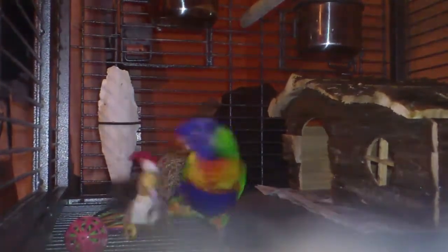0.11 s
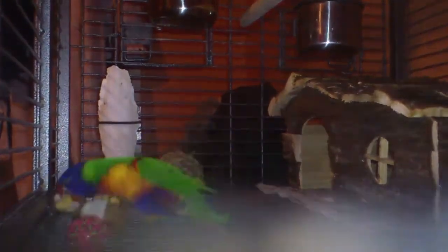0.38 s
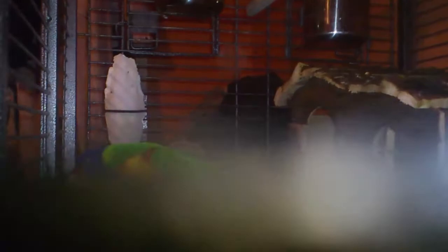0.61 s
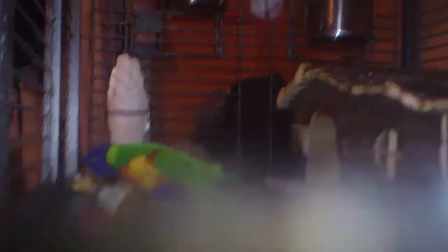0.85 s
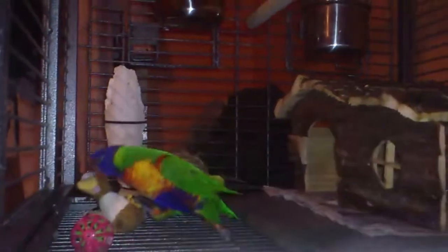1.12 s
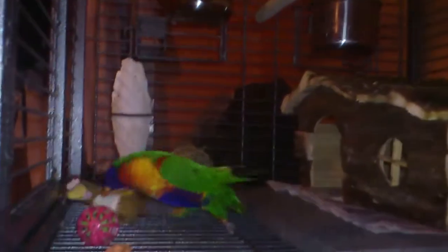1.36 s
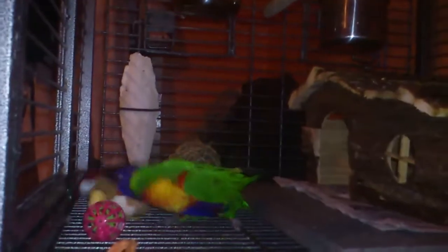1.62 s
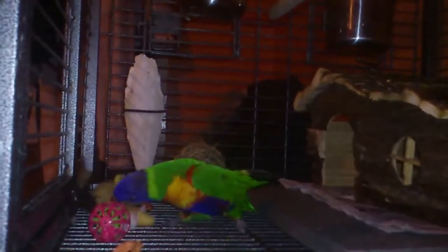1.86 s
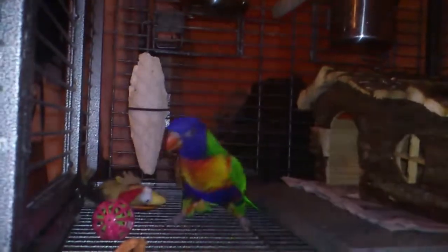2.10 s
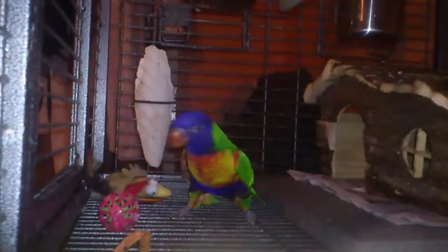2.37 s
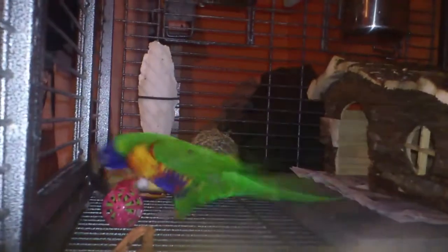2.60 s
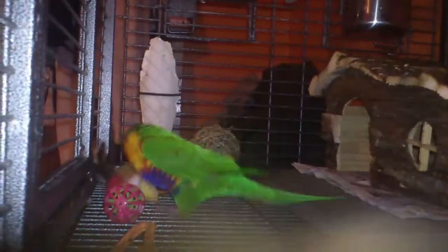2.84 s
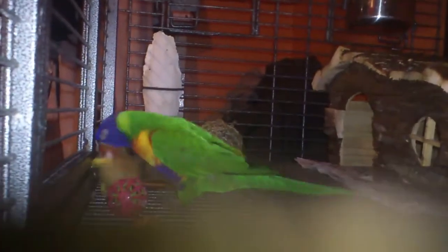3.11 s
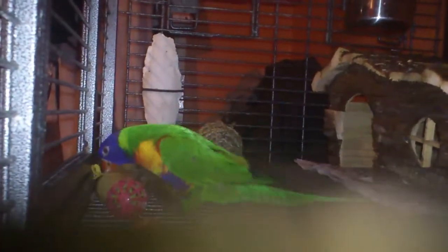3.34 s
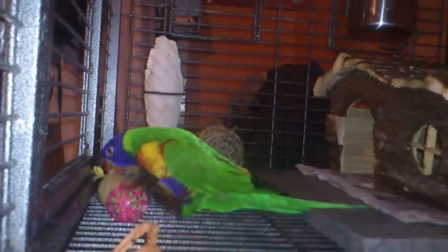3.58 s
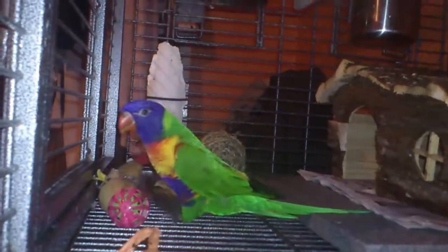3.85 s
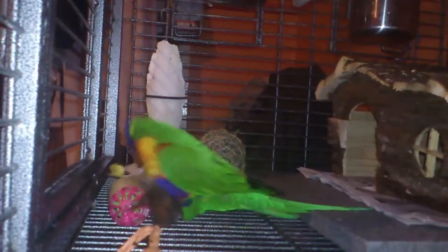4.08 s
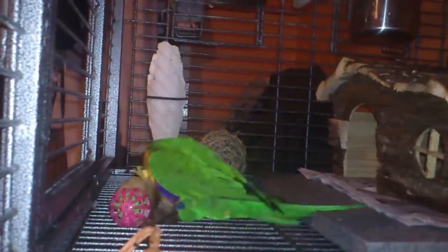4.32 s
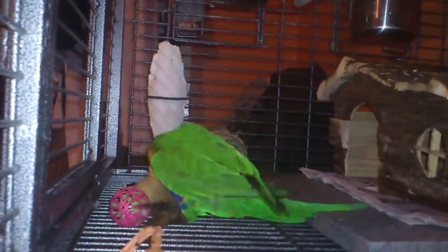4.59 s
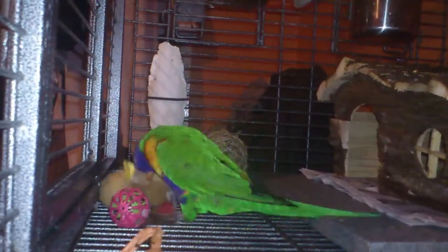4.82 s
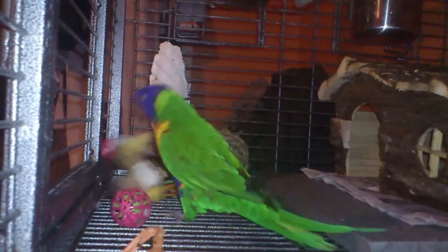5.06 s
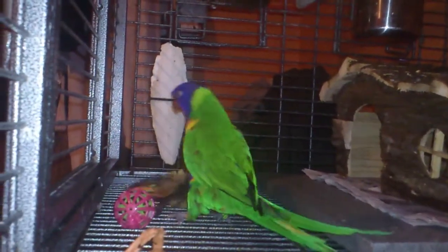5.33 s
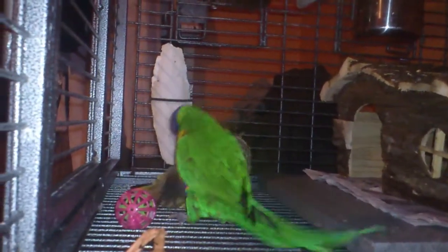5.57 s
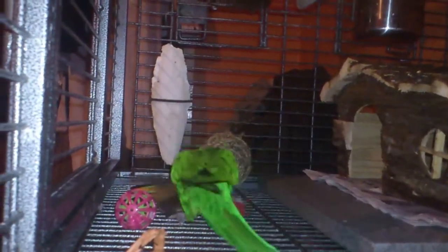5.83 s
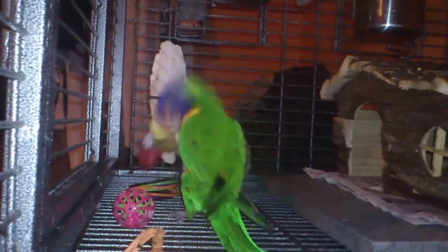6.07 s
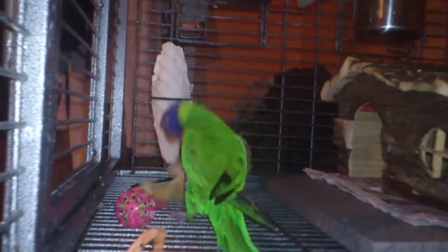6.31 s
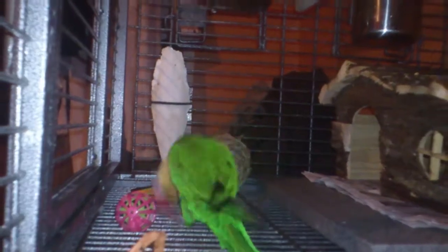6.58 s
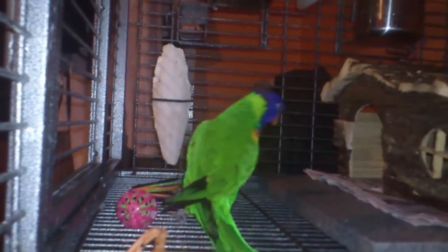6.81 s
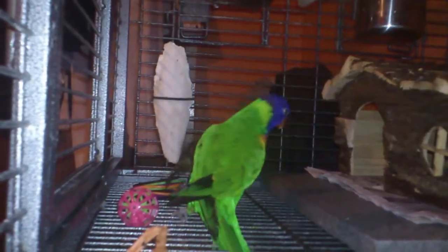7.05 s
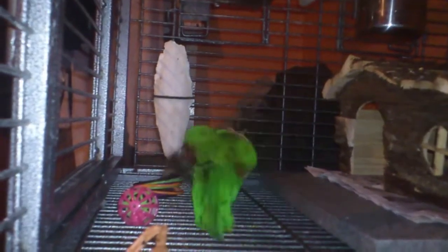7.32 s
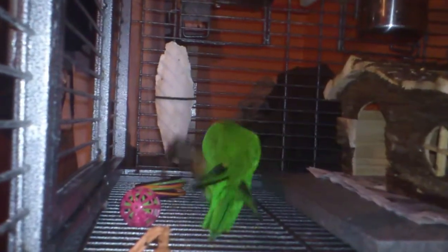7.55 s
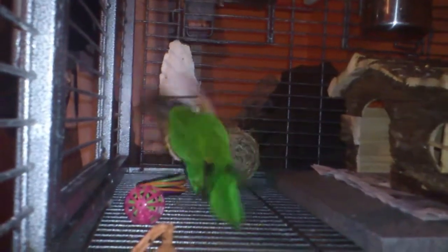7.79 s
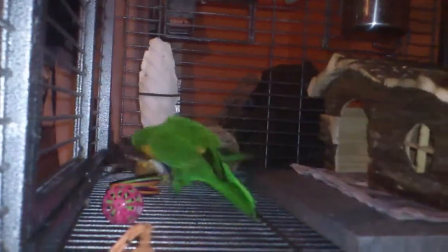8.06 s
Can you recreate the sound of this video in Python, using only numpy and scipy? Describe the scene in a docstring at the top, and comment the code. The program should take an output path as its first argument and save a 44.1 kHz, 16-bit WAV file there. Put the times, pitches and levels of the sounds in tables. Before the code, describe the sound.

A small parrot knocks a toy about its metal cage, irregular clanks and wire rattles mixed with short hoarse squeaks, close up in a quiet room.

```python
"""Beside a small parrot's cage in a quiet room: the bird beats a toy about the wire grate.
Blows and drags are bursts of noise that ring the wires, panels and tray; clacks and knocks are damped tones.
Beak and claws tick with short snaps, an edge scrapes, and the bird squeaks in shaky, hoarse whistles.
A hand bumps the close, hand-held camera; its right port hears less treble, and the room hums and hisses."""
import sys
import numpy as np
from scipy import signal
from scipy.fft import rfft, irfft
from scipy.io import wavfile
from scipy.ndimage import uniform_filter1d

SR = 44100
rng = np.random.default_rng(int(sys.argv[2]) if len(sys.argv) > 2 else 0)


def store_wav(level_fs):
    """Save 16-bit WAV to argv[1]."""
    pcm = np.round(np.clip(np.atleast_2d(level_fs), -1, 1) * 32767)
    wavfile.write(sys.argv[1], SR, pcm.T.astype(np.int16))


def magnitude_from_level(level_db):
    """Linear magnitude for a level in decibels (20 dB per decade)."""
    exponent = np.asarray(level_db, float) / 20
    return 10 ** exponent


N = 360297
TIME = np.arange(N) / SR
TOP_HZ = 16000

# the three bands in which a contact pushes, low to high: low_hz, high_hz
BAND_HZ = [(25, 2000), (2000, 6500), (6500, 16000)]
# hollow clacks of the toy, and low or ringing knocks under hard blows:
# start_s, base_hz, level_db (lowest tone), step_db (per overtone),
# t60_s (time the lowest tone takes to fall by 60 dB)
CLACKS = [(2.3984, 2887, -10.5, 4.5, 0.015), (2.4908, 2030, -18.5, -4.5, 0.0047),
          (5.107, 657, -21.5, -29, 0.1), (5.4829, 2870, -12, 3.5, 0.012), (5.498, 2630, -20.5, -27, 0.033),
          (5.574, 1794, -18.5, -17, 0.017), (6.2543, 2660, -5.5, -15, 0.019)]


def colour(x, points):
    """Shape the spectrum by (Hz, dB) points, joined along a logarithmic pitch scale."""
    hz, db = np.transpose(points)
    f = np.maximum(np.fft.rfftfreq(x.shape[-1], 1 / SR), 1)
    gain = magnitude_from_level(np.interp(np.log(f), np.log(hz), db))
    return irfft(rfft(x) * gain, x.shape[-1])


def band(x, lo_hz, hi_hz):
    """Keep what lies between two pitches, with a causal band-pass."""
    return signal.sosfilt(signal.butter(2, [lo_hz, hi_hz], "bandpass", fs=SR, output="sos"), x)


def unit(x):
    """Scale to energy 1."""
    return x / np.sqrt(np.sum(x ** 2, axis=-1, keepdims=True))


def through(x, response):
    """Let a sound ring through one response per channel (convolution)."""
    return signal.fftconvolve(np.atleast_2d(x), response, axes=1)[:, :N]


def ring(s, hz, db, t60, rise):
    """One damped tone that starts at s seconds, rises and dies away."""
    out = np.zeros(N)
    i = int(s * SR) + 1
    t = TIME[i:i + int(2 * t60 * SR)] - s
    fade = magnitude_from_level(db - 60 * t / t60)
    out[i:i + len(t)] = fade * np.minimum(t / rise, 1) * np.sin(2 * np.pi * hz * t)
    return out


def room(t60, wet_db):
    """Direct sound, then a short dull tail of noise from cage walls and furniture."""
    t = np.arange(SR // 2) / SR
    tail = band(rng.standard_normal((2, len(t))), 570, 7300)
    tail = tail * magnitude_from_level(-60 * t / t60) * (t > .002)
    tail = magnitude_from_level(wet_db) * unit(tail)
    tail[:, 0] = 1  # the direct sound
    return tail


def bursts(rows):
    """Noise bursts (s, rise s, fall s, three band dB), each band with the energy of 20 ms at its level."""
    out = np.zeros((3, N + SR))
    for s, rise, fall, *db in rows:
        t = np.arange(int((rise + 6 * fall + 0.018) * SR)) / SR
        shape = np.where(t < rise, t / rise, np.exp((rise - t) / fall))
        # uneven grains: the contact chatters
        chatter = magnitude_from_level(6.7 * rng.standard_normal(len(t) // 64 + 1)).repeat(64)[:len(t)]
        grains = rng.standard_normal(len(t)) * chatter
        # each contact lands on another spot and has its own colour
        spot = .12 * rng.standard_normal(16)
        spot[0] = 1
        grains = signal.lfilter(spot, 1, grains)
        parts = unit(np.array([band(shape * grains, *hz) for hz in BAND_HZ]))
        i = int(s * SR)
        out[:, i:i + len(t)] += magnitude_from_level(np.array(db))[:, None] * parts * np.sqrt(SR / 50)
    return out[:, :N]


def cage(count):
    """How the cage rings at both ports: clusters of wire tones over the dense ring of the panels."""
    # overtones of the wires, each a cluster of unequal bars: pitch_hz, level_db (relative), t60_s
    wire_rows = [(385.5, 6.5, 1.31), (1049, 3, 1.3), (2030, -2.5, 0.7), (3410, -9, 1), (5056, -5, 0.6),
                 (9360, -2, 0.38), (9970, 6, 0.066), (10430, -11, 0.046), (11760, -12, 0.58),
                 (14900, -14, 0.31)]
    # loose panels and tray, too dense for single tones: pitch_hz, level_db (relative), t60_s
    panel_rows = [(51.6, -5.5, 1), (128.6, 0.5, 0.93), (275.7, 7, 0.9), (738, 12, 0.54), (1435, 14, 0.21),
                  (2960, -1.5, 0.1), (3500, 5.5, 0.29), (8260, -8, 0.37)]
    apart = 0.95  # how much the panel ring differs between the ports from 600 Hz up; less below
    t = np.arange(SR) / SR
    wires = np.zeros((2, SR))
    for hz, db, t60 in wire_rows:
        detune = rng.standard_normal((count, 1))
        phase = 2 * np.pi * rng.random((count, 1))
        # the ports hear each bar out of step, more so at high pitch
        lag = min(hz / 1500, 3) * rng.standard_normal((count, 1))
        alive = t[:int(t60 * SR)]
        fade = magnitude_from_level(db - 60 * alive / t60)
        angle = 2 * np.pi * (hz + (15 + .016 * hz) * detune) * alive + phase
        wires[:, :len(alive)] += fade * np.array([np.sin(angle).sum(0), np.sin(angle + lag).sum(0)])
    panels = 0
    for hz, db, t60 in panel_rows:
        mid, side = band(rng.standard_normal((2, SR)), hz / 1.285, min(hz * 1.354, TOP_HZ))
        side = apart * min(hz / 600, 1) ** 0.54 * side
        pair = np.array([mid + side, mid - side])
        panels = panels + magnitude_from_level(db - 60 * t / t60) * pair / pair.std()
    return wires + magnitude_from_level(14.0) * panels


def rattle():
    """Blows, drags, clacks and knocks shake the cage; each band of the push rings its own part."""
    # blows on grate and bars, pushes before the cage rings:
    # start_s, tip_db (wire tips, over 6.5 kHz), frame_db (under 2 kHz)
    blow_rows = [(0.198, -59.5, -45), (0.3439, -44.5, -46), (1.482, -43.5, -52.5), (1.5669, -30, -44.5),
                 (1.653, -43, -53.5), (2.5532, -48, -65), (2.649, -44.5, -57.5), (2.784, -50.5, -83),
                 (2.8136, -41, -54.5), (3.202, -50, -81), (3.263, -50.5, -44.5), (3.6282, -49, -51.5),
                 (4.1912, -55.5, -51), (4.219, -49, -56), (4.4169, -50.5, -54), (4.941, -51.5, -52),
                 (5.103, -44.5, -29), (5.8663, -44, -43.5), (5.891, -46, -53), (6.246, -34.5, -19),
                 (7.2296, -44.5, -59), (7.3157, -31.5, -51.5), (7.3647, -31.5, -36), (7.513, -51, -61),
                 (7.6301, -45.5, -59.5), (7.716, -40, -48.5), (7.813, -34.5, -45), (7.8919, -33.5, -24.5)]
    # the toy dragged over the grate: start_s, peak_s,
    # end_s (sets the fall; if before the peak, the drag dies within a few ms),
    # low_db, middle_db, high_db (pushes before the cage rings)
    drag_rows = [(0, 0.034, 0.038, -35, -43, -69), (3.033, 3.269, 3.06, -42.5, -49, -48),
                 (4.877, 4.88, 5, -42, -54, -71), (6.85, 6.91, 7.077, -31.5, -38.5, -41.5)]
    rows = []
    for s, tip, low_db in blow_rows:
        # the harder the frame is hit, the longer the toy clatters on
        rise = 0.0013 + 0.006 * magnitude_from_level(low_db + 24)
        fall = 0.0077 + 0.023 * magnitude_from_level(3.8 * (low_db + 16.0))
        # the bars between get a mix of both pushes
        bars_db = low_db + 0.3 * (tip - low_db) - 1.6
        rows.append((s, rise, fall, low_db, bars_db, tip))
    for s, hz, db, step, t60 in CLACKS:
        rows.append((s, .001, .002, db - 50, db - 40, db - 34 + step))
    drags = [(start, max(peak - start, .001), max(end - peak, .003) / 3, *db)
             for start, peak, end, *db in drag_rows]
    response = cage(count=22)
    # how strongly the cage answers in each band, to even the bands out
    size = []
    for lo_hz, hi_hz in BAND_HZ:
        energy = np.mean(np.sum(band(response, lo_hz, hi_hz) ** 2, axis=1))
        size.append(np.sqrt(energy * SR / 2 / (hi_hz - lo_hz)))
    dragged = bursts(drags)
    low, mid, high = bursts(rows) + dragged
    # dragging sets the tray rumbling
    low = low + magnitude_from_level(-7.0) * band(dragged[0], 39, 410)
    frame = magnitude_from_level(8) * through(low, response) / size[0]
    # loose joints buzz as long as the frame shakes
    buzz = np.abs(frame[0]) * rng.standard_normal(N)
    mid = magnitude_from_level(7.5) * mid + magnitude_from_level(-6.0) * band(buzz, *BAND_HZ[1])
    high = magnitude_from_level(12.5) * band(high, 5940, 15200) + magnitude_from_level(-8.5) * band(buzz, *BAND_HZ[2])
    bars_and_tips = through(mid / size[1] + high / size[2], response)
    # the contact itself is heard too, dry
    contact = magnitude_from_level(-6.5) * (low + mid + high)
    return frame + bars_and_tips + contact


def clacks():
    """Clacks and knocks ring on four slightly mistuned, near-whole multiples, the higher ones shorter."""
    out = np.zeros(N)
    for s, base_hz, level_db, step, t60 in CLACKS:
        for k in range(1, 5):
            multiple = k + .08 * (k == 1)  # the lowest tone sits a little high
            hz = multiple * base_hz * (1 + .008 * rng.standard_normal())
            db = level_db + step * (k - 1) - 22 * (k == 4)
            out += ring(s, hz, db, t60 / k ** .15, rise=.0008)
    return out


def squeaks():
    """The bird's shaky whistle; overtone levels follow a line through the first and third, then fade."""
    # start_s, length_s, first_hz, last_hz, level_db (first harmonic at full effort, before the shake),
    # third_db (third harmonic relative to the first at full effort), hoarseness (0 to 1)
    squeak_rows = [(1.041, 0.029, 2170, 1823, -37.5, -9.5, 0.18),
                   (1.112, 0.061, 2131, 2005, -42.5, -12, 0.74), (3.575, 0.014, 1980, 1650, -53, -30, 0.55),
                   (4.301, 0.016, 2030, 1884, -32, -17, 0.23), (4.615, 0.035, 2208, 1890, -24, -18, 0.24),
                   (4.649, 0.016, 2126, 2520, -35.5, -6, 0.97), (4.686, 0.034, 2387, 2463, -31.5, -7, 0.92),
                   (4.734, 0.074, 3170, 3830, -34, -8.5, 0.38),
                   (5.946, 0.013, 1990, 2026, -28.5, -16, 0.32),
                   (5.971, 0.041, 2054, 2173, -29.5, -19.5, 0.27),
                   (6.132, 0.035, 2140, 1855, -32.5, 6.5, 0.31), (6.179, 0.0135, 3440, 3280, -39, -2, 0.9),
                   (6.201, 0.0374, 2372, 2232, -29.5, 2, 0.29), (6.739, 0.034, 1897, 1810, -42.5, 0.5, .25),
                   (6.78, 0.12, 1850, 2530, -30.5, -4.5, 0.34),
                   (6.906, 0.037, 3313, 3302, -29.5, -12.5, 0.25),
                   (6.956, 0.033, 3316, 3500, -32.5, -14, 0.44)]
    release_s, release_db = 0.01, -22
    out = np.zeros(N)
    for s, length, first_hz, last_hz, top_db, bright_db, hoarse in squeak_rows:
        if last_hz < .94 * first_hz:
            # a falling squeak swells, stays loud to its end and has weak even overtones
            start_db, peak, end_db, bend, even_db = -9.5, 0.64, -0.5, 0.593, -8.5
        else:
            # any other speaks at once, sags, and bends late if long
            start_db, peak, end_db, bend, even_db = -13, 0.045, -3.5, 1 + 4.0 * length, -0.5
        t = np.arange(int((length + release_s) * SR)) / SR
        hz = first_hz + (last_hz - first_hz) * np.minimum(t / length, 1) ** bend
        effort_db = np.interp(t, [0, peak * length, length, length + release_s],
                              [start_db, 0, end_db, end_db + release_db])
        first_db = top_db + effort_db
        # more effort, brighter tone
        third_db = first_db + bright_db + 0.23 * effort_db
        # hoarseness shakes both pitch and loudness
        noise = rng.standard_normal((2, SR // 5))[:, :len(t)]
        air = band(noise[0], 4400, 13500)
        shake = uniform_filter1d(uniform_filter1d(noise, 120, axis=1), 120, axis=1)
        shake = hoarse * shake / shake.std()
        phase = 2 * np.pi * np.cumsum(hz * (1 + 0.0348 * shake[0])) / SR
        # 3 ms ramps at both ends
        edge = np.clip(np.minimum(t, t[-1] - t) / .003, 0, 1) * magnitude_from_level(6.0 * shake[1])
        i = int(s * SR)
        # air past the syrinx (the bird's voice organ) pulses with the tone
        out[i:i + len(t)] += hoarse * edge * magnitude_from_level(first_db - 9) * air * (1 + np.cos(phase))
        for k in range(1, 8):
            slope = min(np.log(k) / np.log(3), 1.1)
            db = first_db + (third_db - first_db) * slope + even_db * (k % 2 == 0)
            # each overtone comes and goes on its own
            patch = uniform_filter1d(uniform_filter1d(rng.standard_normal(SR // 5), 500), 500)
            db = db + (k > 1) * 2.5 * (patch[:len(t)] / patch.std() - .5)
            # overtones fade past the third; those near 10 kHz come out stronger, those near 6.6 kHz weaker
            db = db - 4.2 * max(k - 3, 0)
            db = db + 6.9 * np.exp(-((k * hz - 9700) / 1100) ** 2)
            db = db - 8.2 * np.exp(-((k * hz - 6650) / 450) ** 2)
            audible = k * hz < TOP_HZ
            out[i:i + len(t)] += np.sqrt(2) * edge * magnitude_from_level(db) * np.sin(k * phase) * audible
    return out


def ticks():
    """Beak and claws: single-sample pushes through three bands make dry snaps."""
    # start_s, low_db, middle_db, high_db (pushes before the last band-pass)
    tick_rows = [(0.286, -54, -50, -38), (0.4366, -44.5, -38.5, -32), (1.36, -51, -45.5, -39.5),
                 (2.3982, -42.5, -31.5, -29), (2.9937, -43, -35, -27.5), (3.52, -46.5, -41, -32.5),
                 (3.588, -57, -52, -50.5), (8.0467, -46, -61, -36.5)]
    pushes = np.zeros((3, N))
    for s, *db in tick_rows:
        # each band holds the energy of 20 ms at its level
        pushes[:, int(s * SR)] = magnitude_from_level(np.array(db)) * np.sqrt(SR / 50)
    snap = np.zeros(N)
    for push, (lo_hz, hi_hz) in zip(pushes, BAND_HZ):
        snap += band(push, lo_hz, hi_hz) * np.sqrt(SR / 2 / (hi_hz - lo_hz))
    return band(snap, 200, 9100)


def scrape():
    """A dragged plastic edge chatters through broad resonances, then drops to almost nothing."""
    # resonances of the edge: low_hz, high_hz, level_db (before the swell)
    resonance_rows = [(876, 1350, -30), (1620, 3600, -34), (6260, 13900, -30)]
    # turning points of the swell: start_s, full_s, easing_s, end_s
    swell_s = (0, .035, .095, .118)
    swell = np.interp(TIME, swell_s, [0.17, 1, 1.0, 0.0012])
    chatter = rng.standard_normal(N) * magnitude_from_level(1.6 * rng.standard_normal(N // 64 + 1)).repeat(64)[:N]
    out = np.zeros(N)
    for lo_hz, hi_hz, db in resonance_rows:
        tone = band(band(chatter, lo_hz, hi_hz), lo_hz, hi_hz)
        out += magnitude_from_level(db) * tone / tone.std()
    return swell * out


def bumps():
    """A hand bumps the camera by the right port: short, low damped tones."""
    # start_s, pitch_hz, level_db (at the start of the fade)
    bump_rows = [(0.496, 327, -17.5), (1.058, 320, -22.5), (7.8274, 336, -2.5), (7.8343, 204, -7.5)]
    return sum(ring(*row, t60=0.0098, rise=0.00067) for row in bump_rows)


def background():
    """Room hum and hiss from shaped noise, most alike left and right in the bass."""
    # spectrum of the room noise: pitch_hz, level_db (per Hz, relative)
    room_points = [(25, 0), (58, 4.5), (161, -5), (217, 0), (317, -15), (384, 7), (451, -11), (560, -12.5),
                   (3820, -23), (11000, -23), (16000, -29.5)]
    mid, side = colour(rng.standard_normal((2, N)), room_points)
    side = colour(side, [(60, -8.0), (500, -6.5), (2000, -0.5)])
    pair = np.array([mid + side, mid - side])
    return magnitude_from_level(-55.5) * pair / pair.std()


def scene():
    """Near sounds reach the right port late and duller, round the camera body; the room joins both."""
    # right port relative to the left: pitch_hz, level_db
    shadow_points = [(200, 2), (1300, -2.5), (4400, -2), (6500, -8), (9000, -21)]
    lag_s = .00009  # the left port hears the bird's corner first
    voiced = through(squeaks() + scrape(), room(0.14, -7.5))
    shaded = rattle() + voiced
    facing = through(clacks(), room(0.13, -9.5))
    facing = facing + through(ticks(), room(0.05, -12.5))
    # clacks, knocks and ticks are shadowed less
    right = colour(shaded[1], shadow_points) + colour(facing[1], np.array(shadow_points) * [1, .4])
    right = np.interp(TIME - lag_s, TIME, right) + bumps()
    return np.array([shaded[0] + facing[0], right]) + background()


def band_limit(x):
    """A steep low-pass at the top of the band."""
    return signal.sosfilt(signal.butter(12, 16440, fs=SR, output="sos"), x)


def record(dry):
    """The top of the treble is cut, and peaks beyond full scale clip."""
    cut = signal.sosfilt(signal.ellip(8, .2, 60, TOP_HZ, fs=SR, output="sos"), dry)
    mix = np.clip(cut, -1, 1)
    return band_limit(mix)


dry = scene()
out = record(dry)
store_wav(out)
```